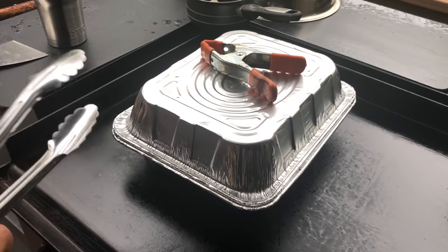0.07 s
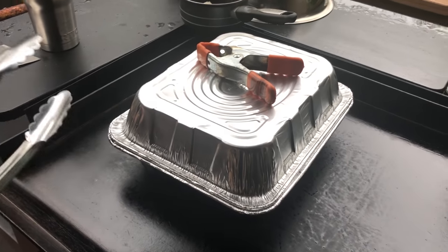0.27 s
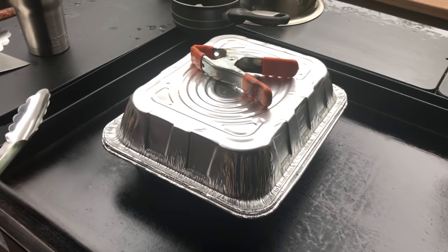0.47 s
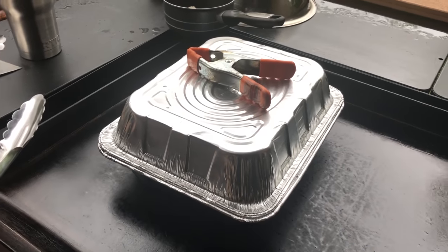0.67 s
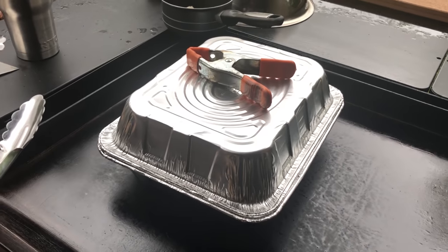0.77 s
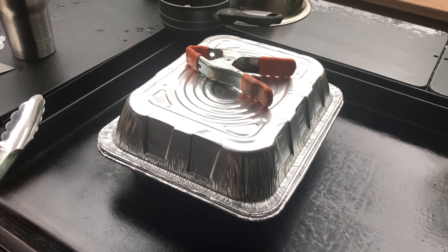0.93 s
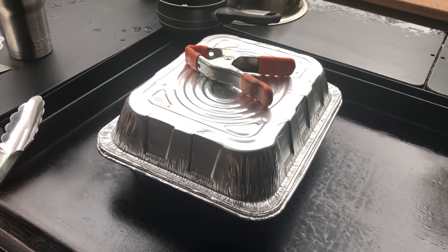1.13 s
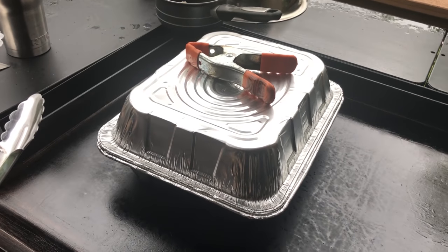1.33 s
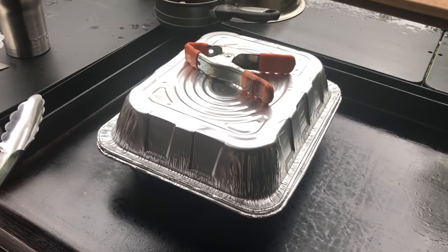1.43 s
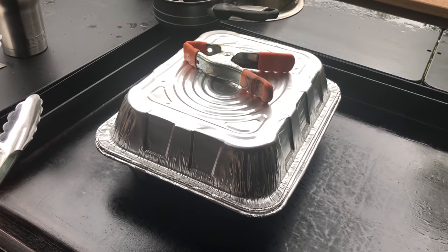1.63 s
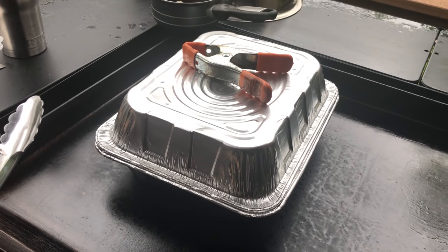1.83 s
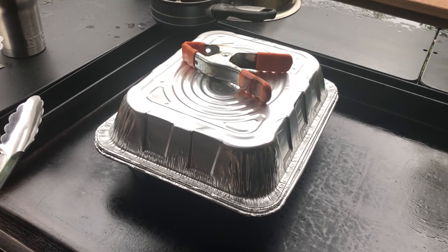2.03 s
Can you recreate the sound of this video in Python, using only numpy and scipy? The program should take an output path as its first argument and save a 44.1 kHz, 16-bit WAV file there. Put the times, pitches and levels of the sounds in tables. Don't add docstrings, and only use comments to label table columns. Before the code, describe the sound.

Popcorn pops under a foil tray on an outdoor steel griddle: one crack, a louder close pair with foil booming and crinkling, then a duller late pop; faint oil hiss and far motor hum, close microphone.

```python
import sys
import numpy as np
from scipy import signal
from scipy.io import wavfile

SR = 44100
rng = np.random.default_rng(int(sys.argv[2]) if len(sys.argv) > 2 else 0)


def boost_factor(decibels):
    exponent = np.asarray(decibels, float) / 20
    return 10 ** exponent


def pcm_store(signal):
    levels = np.round(np.clip(np.atleast_2d(signal), -1, 1) * 32767)
    wavfile.write(sys.argv[1], SR, levels.astype(np.int16).T)


N = 92610
T60_PER_TAU = np.log(1000)


def rms_one(x):
    return x / np.sqrt(np.mean(x ** 2) + 1e-20)


def at_hz(points, hz):
    curve_hz, values = np.transpose(points)
    return np.interp(np.log(hz), np.log(curve_hz), values)


def drift(rate_hz):
    r = np.exp(-2 * np.pi * rate_hz / SR)
    wander = signal.lfilter([1], [1, -2 * r, r * r], rng.standard_normal(N + SR))
    return rms_one(wander[SR:])


def ring(x, hz, t60):
    r, w = boost_factor(-60 / (t60 * SR)), 2 * np.pi * hz / SR
    return signal.lfilter([0, np.sin(w)], [1, -2 * r * np.cos(w), r * r], x + 1e-18)


def resonance(x, hz, width_hz):
    r, w = np.exp(-np.pi * width_hz / SR), 2 * np.pi * hz / SR
    zeros = np.array([1, 0, -1]) * (1 - r * r) / 2
    return signal.lfilter(zeros, [1, -2 * r * np.cos(w), r * r], x + 1e-18)


def clicks(s, db):
    out = np.zeros(N)
    out[(np.asarray(s) * SR).astype(int)] = boost_factor(db)
    return out


def decay(x, t60):
    return signal.lfilter([1], [1, -boost_factor(-60 / (t60 * SR))], x + 1e-18)


def bands(spectrum, low_hz, high_hz):
    edges = np.geomspace(low_hz, high_hz, int(3 * np.log2(high_hz / low_hz)))
    white = rng.standard_normal((2, N + SR // 2))
    out = []
    for k, (low, high) in enumerate(zip(edges, edges[1:])):
        centre = np.sqrt(low * high)
        sos = signal.butter(2, [low, high], "band", fs=SR, output="sos")
        noise = signal.sosfilt(sos, white[k % 2])[-N:]
        out.append((centre, boost_factor(at_hz(spectrum, centre)) * noise))
    total = np.std(sum(x for _, x in out))
    return [(hz, x / total) for hz, x in out]


# time of the turn in seconds, level in dB, seconds from trough to turn.
JOLTS = [
    (0.2174, -21, .0006),
    (0.3269, -8.5, .0006),
    (1.4379, -13.5, .00045),
]


def jolts():
    t, out = np.arange(N) / SR, np.zeros(N)
    for start, level_db, trough_s in JOLTS:
        u = (t - start) / trough_s
        out += boost_factor(level_db) * u * np.exp(0.5 - np.minimum(u ** 2 / 2, 50))
    return out


# start in seconds, crack level in dB, brightness in dB per octave.
BURSTS = [
    (0.2164, -17.5, 0.5),
    (0.3245, -11, 1),
    (0.3260, -8, -0.5),
    (1.438, -20, -3.5),
]


def cracks():
    s, db, _ = np.transpose(BURSTS)
    envelope = decay(clicks(s, db - 8.5), 0.00082 * T60_PER_TAU)
    return resonance(envelope * rng.standard_normal(N), 5270, 8000)


# frequency in Hz, t60 in seconds,
# then level in dB for a burst at the near corner, the middle and the far corner.
TRAY_AIR = [(435, 0.036, -26, -26, -5), (1050, 0.095, -20.5, -14, -9.5), (1634, .04, -7, -4, -1.5),
            (1940, 0.036, -10, -13, -4), (2580, 0.031, 3, -2, -5), (2820, 0.028, -8, -3, -20),
            (3570, 0.037, -2.5, -3, -3.5), (3854, 0.029, -7.5, -9, 2.5), (4380, 0.031, -6.5, 0, -5.5),
            (4790, 0.033, -18, -26, -4), (5370, 0.03, -9, -5, -14), (6170, 0.023, -3, -2.5, -7.5),
            (6850, 0.029, -5, -9, -9.5), (7730, 0.019, -5, 0.5, -26)]
BURST_SPOT = [0, 1, 1, 2]


def tray_air():
    s, db, _ = np.transpose(BURSTS)
    out, white = np.zeros(N), rng.standard_normal(N)
    for hz, t60, *spot_db in TRAY_AIR:
        late_s = rng.uniform(0, 0.0012)
        burst = clicks(s + late_s, db + np.take(spot_db, BURST_SPOT) - 6)
        spray = boost_factor(-36) * white * decay(burst, 0.08)
        out -= ring(burst + spray, hz, t60)
    return out


# frequency in Hz, level in dB per Hz.
SPLATTER = [(200, -10.5), (600, -1.5), (1700, -6), (3000, -8.5), (4300, -9.5), (5200, -15), (8400, -3.5),
            (16000, -17.5)]
# frequency in Hz, t60 in seconds.
SPLATTER_T60 = [(200, 0.3), (1000, 0.092), (3000, .16), (8000, 0.099), (15000, 0.027)]


def splatter():
    s, db, tilt = np.transpose(BURSTS)
    out = np.zeros(N)
    for hz, x in bands(SPLATTER, 198.5, 17020):
        burst = clicks(s, db - 10.5 + tilt * np.log2(hz / 3000))
        splash = boost_factor(2) * decay(burst, 0.013)
        out += x * (decay(burst, at_hz(SPLATTER_T60, hz)) + splash)
    return out


# frequency in Hz, t60 in seconds.
CRINKLE_T60 = [(150, .3), (500, .35), (1500, 0.21), (3500, 0.22), (10000, 0.087)]


def foil(hits, modes, crinkle, crinkle_db):
    s, db = np.transpose(hits)
    signs = rng.choice([-1, 1], (len(s), len(modes)))
    signs[0] = -1
    out = -resonance(clicks(s, db + 4.5 + 21.5), 1500, 1860)
    for (hz, mode_db, t60), sign in zip(modes, signs.T):
        strike = clicks(s, db + mode_db)
        strike[strike > 0] *= sign
        out += ring(strike, hz, min(t60, 0.45))
    out = signal.sosfilt(signal.butter(3, [200, 2230], "band", fs=SR, output="sos"), out)
    struck = clicks(s, db + crinkle_db)
    rise = decay(struck, 0.00051 * T60_PER_TAU)
    for hz, x in bands(crinkle, 130, 8960):
        out += x * (decay(struck, at_hz(CRINKLE_T60, hz)) - rise)
    return out


# start in seconds, level in dB.
ROOF_HITS = [
    (0.3486, -19),
    (0.3552, -21),
    (0.370, -24.5),
    (0.383, -33),
]
# frequency in Hz, level in dB, t60 in seconds.
ROOF_MODES = [(240.7, -8.5, .2), (336, -9, 0.33), (372, -5, .45), (427, -4, 0.24), (448, 6, 0.11),
              (530, -1, .2), (621.7, -4.5, 0.22), (746, -9, 0.3), (819, -6, 0.22), (850, -11, 0.24),
              (904, -10, 0.39), (1210, -16.5, 0.36), (1274, -6, 0.16), (1462, -12, 0.16)]
# frequency in Hz, level in dB per Hz.
ROOF_CRINKLE = [(120, -23.5), (240, -6), (445, 2), (850, -5.5), (1300, -6.5), (1900, -10.5), (2600, -30),
                (5000, -49), (15000, -60)]


def roof():
    return foil(ROOF_HITS, ROOF_MODES, ROOF_CRINKLE, -2.5)


# start in seconds, level in dB.
WALL_HITS = [
    (1.538, -29.5),
    (1.556, -44.5),
    (1.59, -73),
]
# frequency in Hz, level in dB, t60 in seconds.
WALL_MODES = [(234.6, -9, .3), (378, -6.5, 0.53), (401.4, 0, 0.37), (472, -2, 0.28), (476, -5, 0.34),
              (584, -1.5, .25), (700, -25, .25), (813, -18, 0.16), (883, -14, 0.35), (1061, -1.5, 0.27),
              (1138, -8.5, 0.36), (1246, -6, 0.28), (1384, -1.5, 0.17), (1663, -11.5, 0.15)]
# frequency in Hz, level in dB per Hz.
WALL_CRINKLE = [(120, -9), (390, -1.5), (800, -3.5), (1300, -4), (2100, -21), (3500, -22.5), (4800, -48),
                (14000, -39)]


def wall():
    return foil(WALL_HITS, WALL_MODES, WALL_CRINKLE, 0)


# start in seconds, level in dB, brightness in dB per octave.
LANDINGS = [(0.4555, -30, -5), (0.461, -31.5, -3), (0.4728, -40.5, 1.5), (0.49, -40, -5.5),
            (0.5165, -29.5, -3), (0.521, -50, -6), (0.625, -51, -2.5), (1.4362, -34, 4.5), (1.473, -51, 7),
            (1.509, -43, 1.5), (1.543, -42, 5), (1.625, -51, 2.5), (1.711, -52, -6)]
# frequency in Hz, level in dB, t60 in seconds.
STEEL = [(820, -22, .04), (1380, -11, .045), (1710, -11, .035), (1930, -15, .03)]
# frequency in Hz, level in dB per Hz.
RATTLE = [(900, 2), (2000, 0), (3500, -0.5), (6000, -12), (10000, -11), (12500, -20), (16000, -25)]


def landings():
    s, db, tilt = np.transpose(LANDINGS)
    spread_db = rng.normal(0, 1.9, (len(s), len(STEEL)))
    out = np.zeros(N)
    for k, (hz, mode_db, t60) in enumerate(STEEL):
        touch = clicks(s, db - 3 * tilt + mode_db + spread_db[:, k] - 19)
        skid = decay(touch, 0.003 * T60_PER_TAU)
        out += ring(skid * rng.standard_normal(N), hz, t60)
    for hz, x in bands(RATTLE, 900, 13000):
        out += x * decay(clicks(s, db - 4.5 + tilt * np.log2(hz / 1700)), 0.054)
    return out


# start in seconds, level in dB, frequency in Hz, t60 in seconds.
PINGS = [
    (.628, -57, 1884, 0.22),
    (1.458, -37.5, 2005, .07),
    (1.713, -50.5, 1860, 0.17),
    (1.77, -53.5, 1497, 0.12),
]


def pings():
    return sum(ring(clicks([s], db), hz, t60) for s, db, hz, t60 in PINGS)


# frequency in Hz, level in dB per Hz.
HISS = [(110, -13), (200, -4.5), (290, -13.5), (400, -10), (1200, -20), (6200, -28.5), (9500, -27),
        (16000, -35.5)]
# frequency in Hz, width in Hz, level in dB.
HISS_PEAKS = [(1730, 130, -7.5), (3640, 1300, 0), (5180, 57, 7.5), (8100, 3800, -9)]


def hiss():
    x = sum(band * boost_factor(0.64 * drift(6.3)) for _, band in bands(HISS, 111, 18150))
    y = x - 0.7 * resonance(x, 2290, 470)
    for hz, width_hz, db in HISS_PEAKS:
        y = y + boost_factor(db) * resonance(x, hz, width_hz)
    return boost_factor(-54) * rms_one(y)


# time in seconds, pitch in Hz, level in dB.
MOTOR = [
    (0, 94.5, -55.5),
    (.6, 89.16, -53.5),
    (1.0, 91.85, -53.5),
    (1.5, 90, -54.5),
    (1.75, 78.95, -61),
    (2.1, 67.5, -64),
]
# multiple of the pitch, level in dB.
MOTOR_ORDERS = [(1, 0.6), (1.75, -8), (2.2, -9)]


def motor():
    s, hz, db = np.transpose(MOTOR)
    t = np.arange(N) / SR
    speed_hz = np.interp(t, s, hz) * (1 + 0.13 * drift(6.2))
    turn = 2 * np.pi * np.cumsum(speed_hz) / SR
    tones = np.zeros(N)
    for order, order_db in MOTOR_ORDERS:
        tones += boost_factor(order_db + 2.2 * drift(5.8)) * np.sqrt(2) * np.sin(order * turn)
    return boost_factor(np.interp(t, s, db)) * tones


# frequency in Hz, level in dB per Hz.
AIR = [(4.7, -40), (8.0, 10), (19, 5), (43, -9), (89, -9.5), (110, -31), (140, -48), (240, -120)]


def air():
    x = sum(band for _, band in bands(AIR, 4, 105))
    return boost_factor(-39.5) * signal.sosfilt(signal.butter(6, 88, fs=SR, output="sos"), x)


def scene():
    bursts = jolts() + cracks() + tray_air() + splatter()
    kernels = roof() + wall() + landings() + pings()
    return (bursts + kernels + hiss() + motor() + air())[None]


def top_cut(x):
    return signal.sosfilt(signal.butter(12, 16760, fs=SR, output="sos"), x)


def record(dry):
    rounded = np.tanh(dry)
    mix = signal.sosfilt(signal.cheby2(6, 40, 16700, fs=SR, output="sos"), rounded)
    return top_cut(mix)


dry = scene()
out = record(dry)
pcm_store(out)
```